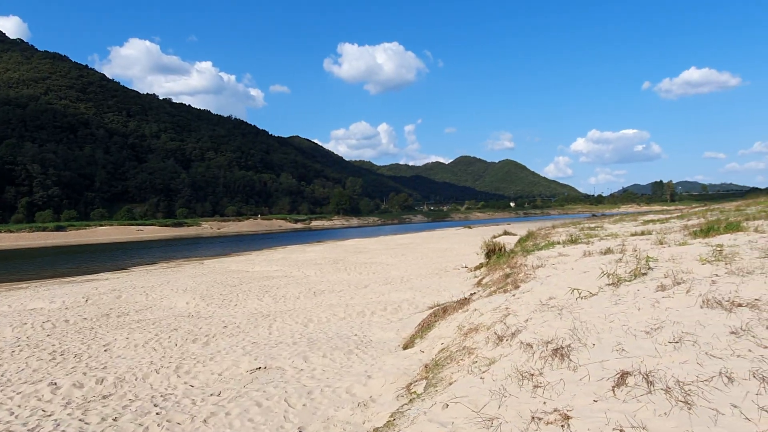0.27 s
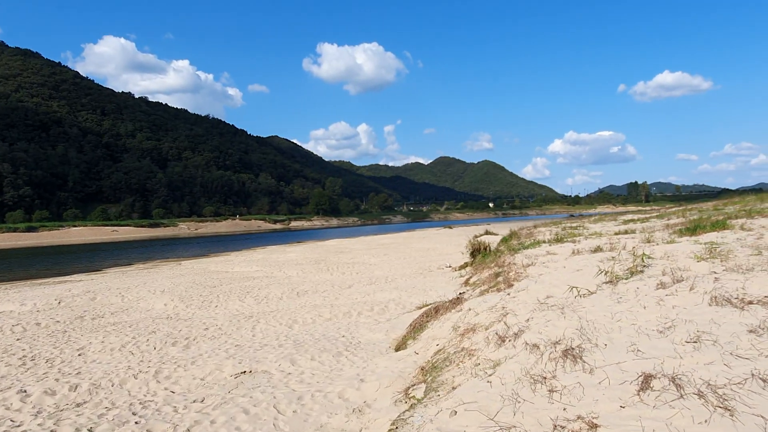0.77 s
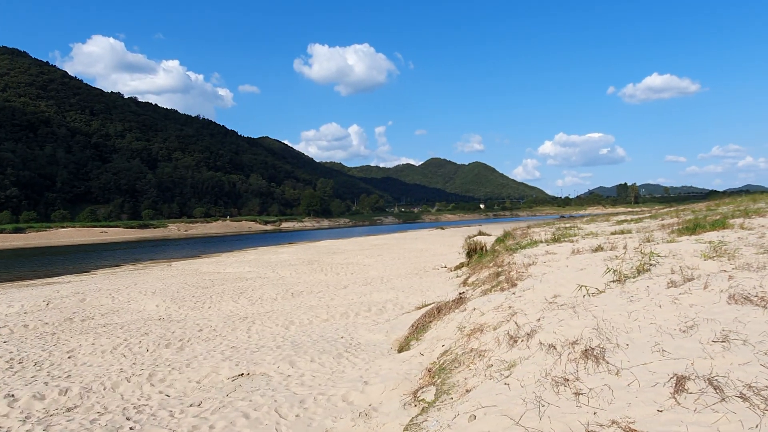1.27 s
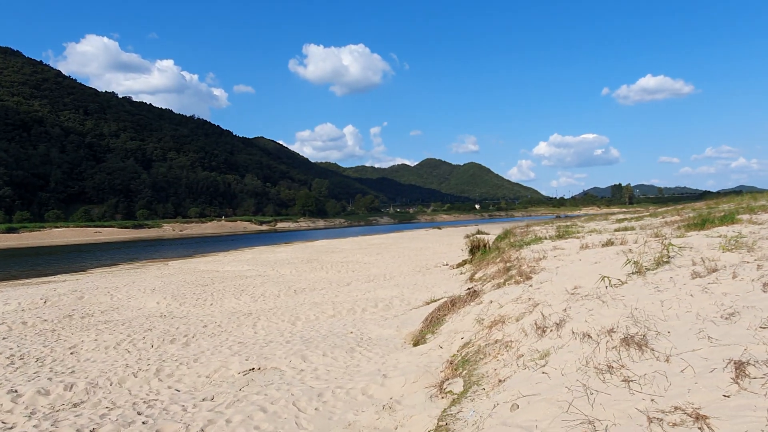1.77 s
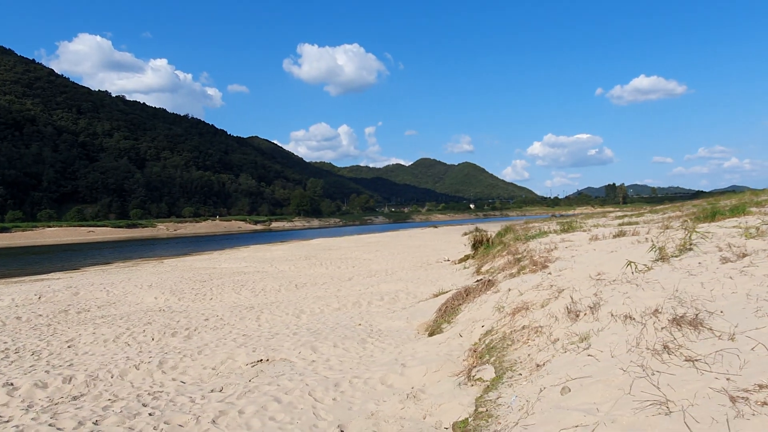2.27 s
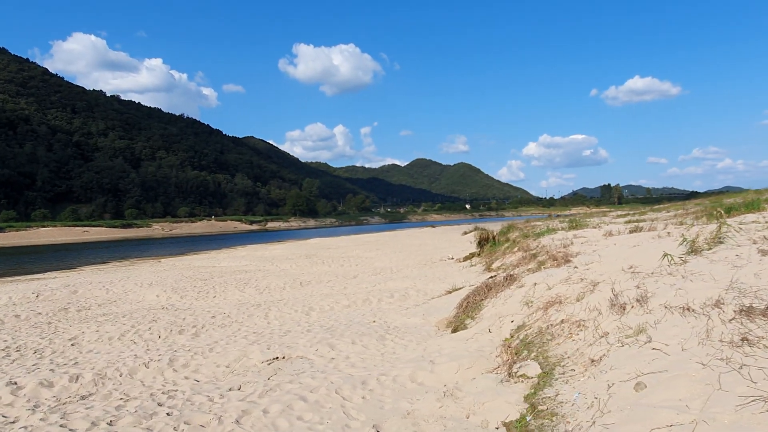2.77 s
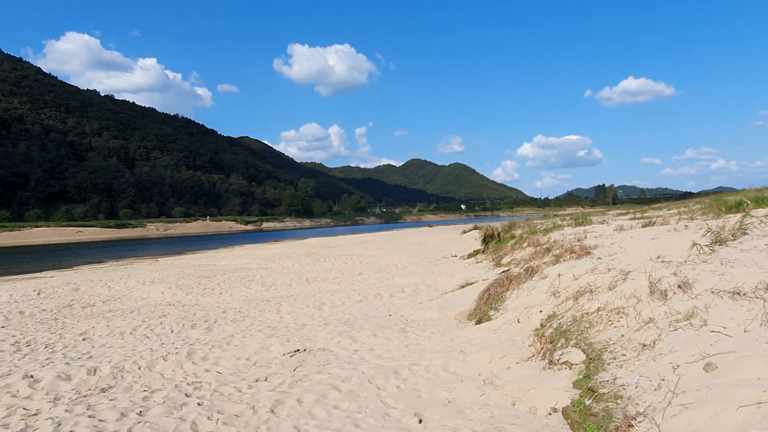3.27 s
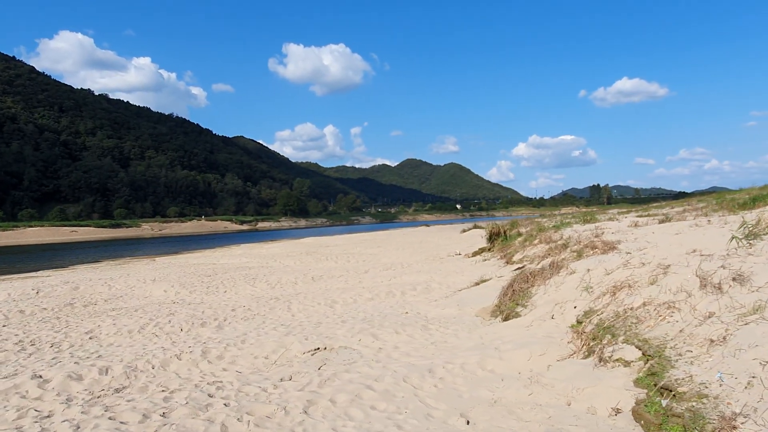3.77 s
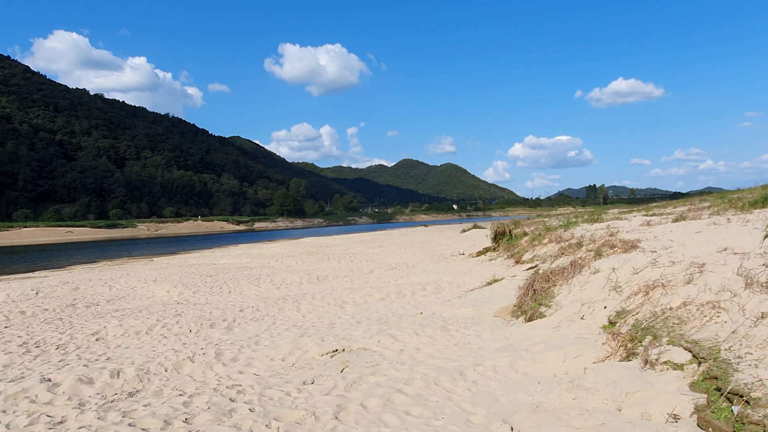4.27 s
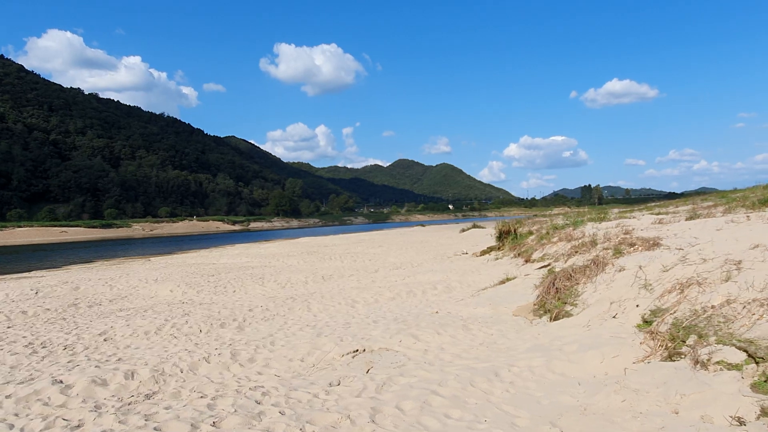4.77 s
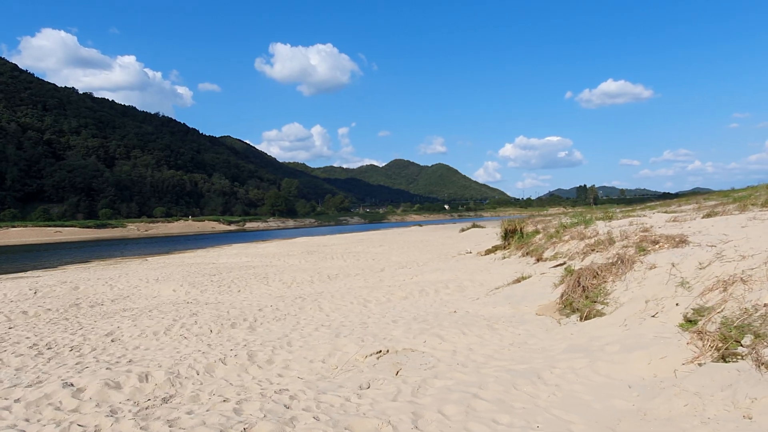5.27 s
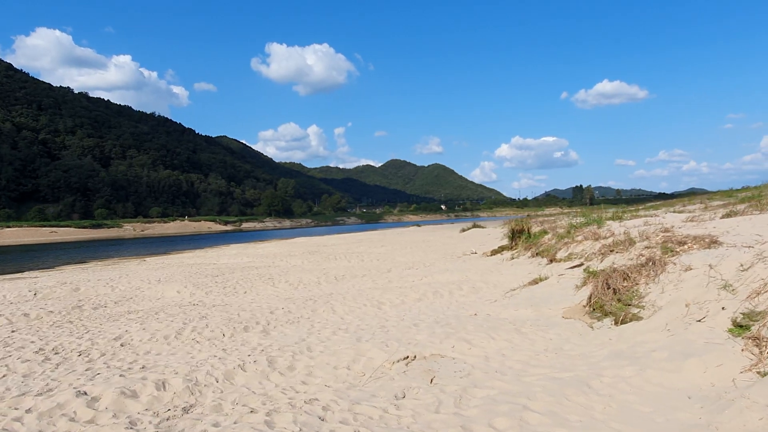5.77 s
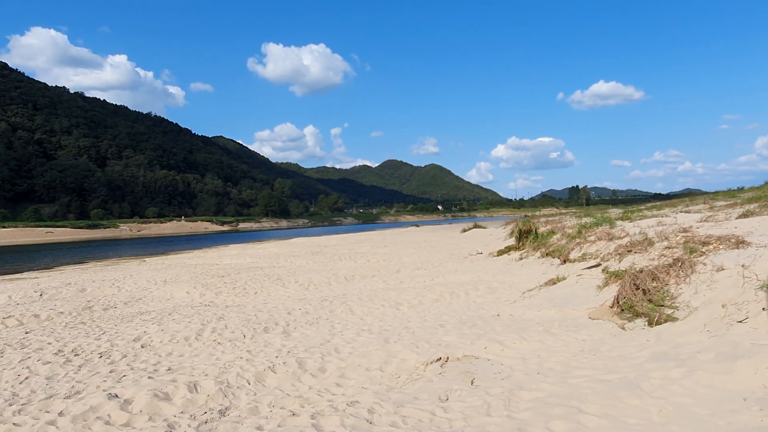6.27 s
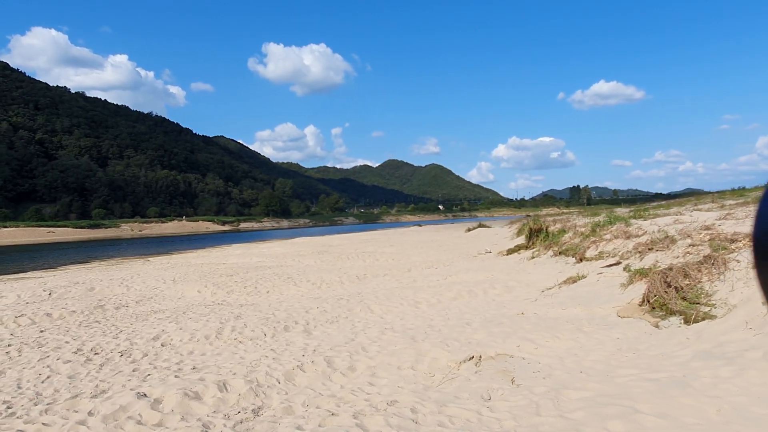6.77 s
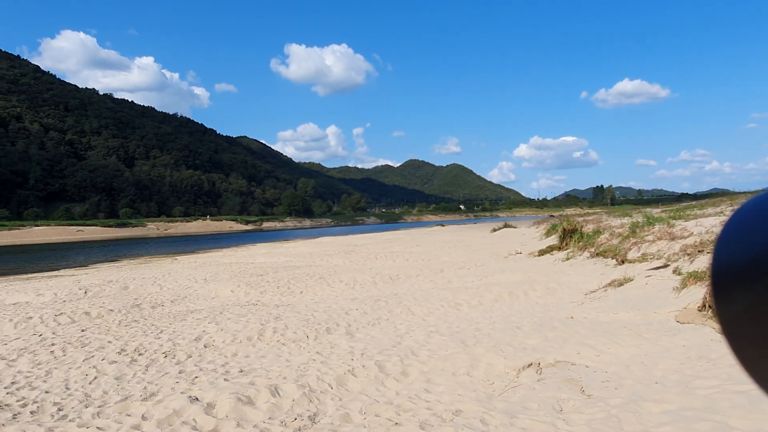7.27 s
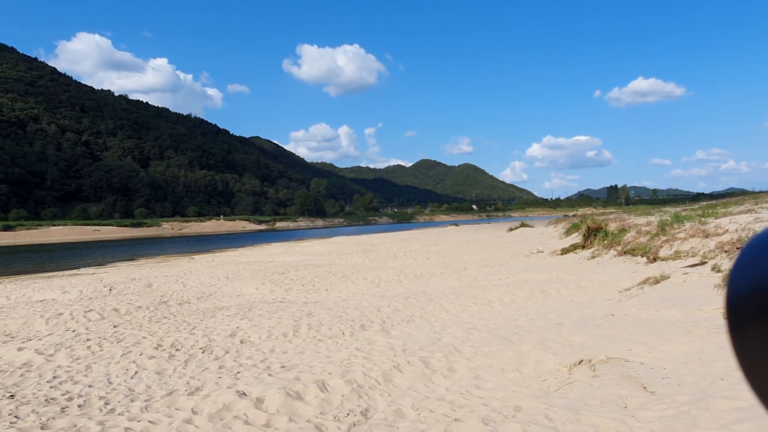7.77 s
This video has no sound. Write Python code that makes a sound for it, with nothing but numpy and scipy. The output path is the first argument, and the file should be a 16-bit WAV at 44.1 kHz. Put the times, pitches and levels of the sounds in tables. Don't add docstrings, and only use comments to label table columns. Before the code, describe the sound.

A bullfrog gives five slow, deep, rattling croaks on an open riverbank, over faint trilling frogs, soft bubbling water and buffeting wind.

```python
import sys
import numpy as np
from scipy import signal
from scipy.fft import rfft, irfft
from scipy.io import wavfile
from scipy.ndimage import uniform_filter1d, map_coordinates

SR = 44100
rng = np.random.default_rng(int(sys.argv[2]) if len(sys.argv) > 2 else 0)


def how_loud(loudness_db):
    steps = np.asarray(loudness_db, float) / 20
    return 10 ** steps


def store_pcm(level_fs):
    pcm = np.round(np.clip(level_fs, -1, 1) * 32767).astype(np.int16)
    wavfile.write(sys.argv[1], SR, np.atleast_2d(pcm).T)


N = 353196
TIME = np.arange(N) / SR
HZ = np.maximum(np.arange(N // 2 + 1) * SR / N, 1)

# start and end in seconds, effort in dB, edge against high throat in dB,
# mouth ring at the start against the end in dB.
CROAKS = [
    (0.48, 1.528, 0, -10.5, -36.5),
    (2.06, 2.997, 2.5, -8.5, -21),
    (3.529, 4.408, 10, -9, -13),
    (4.931, 5.764, 6.5, -6, -14),
    (6.337, 7.165, 5, -3.5, -21.5),
]
# time in seconds, pulses per second.
PULSE_RATE = [
    [(0.5784, 99.1), (0.79, 97.1), (1.0, 97.7), (1.21, 100.0), (1.38, 101.8), (1.44, 100.0)],
    [(2.1426, 100.2), (2.3375, 97.2), (2.525, 98.9), (2.7125, 101.7), (2.9, 102.0)],
    [(3.6163, 101.0), (3.7925, 98.1), (3.965, 99.9), (4.1375, 102.5), (4.31, 102.3)],
    [(5.0487, 98.4), (5.2075, 98.4), (5.365, 100.5), (5.5225, 102.5), (5.68, 102.4)],
    [(6.4267, 98.3), (6.5925, 97.8), (6.755, 99.7), (6.9175, 101.2), (7.08, 100.0)],
]
# first strong pulse in seconds, flutter in Hz,
# flutter depth in dB, sag just before in dB.
STROKES = [(0.554, 28.4, 17, 51), (0.986, 30.7, 13, -16.5), (1.227, 30, -14, -9.5), (2.148, 28.2, -4, 4),
           (2.507, 27.5, 1, -10.5), (2.735, 30, -4, -6), (3.628, 26, 32, -2), (3.918, 27.4, 4, -11),
           (4.138, 30, 4, -5.5), (5.036, 30, -2, -36), (5.344, 32, 5, -6), (5.503, 31.3, 2, -3),
           (6.415, 31, 87, -40), (6.761, 32, -2, 0), (6.954, 28.5, 12, -9)]
# middle in seconds, extra level in dB, length in seconds.
ACCENTS = [(0.557, 12, 0.01), (0.594, 7, 0.02), (0.622, -0.5, 0.015), (0.657, 6, 0.0086),
           (0.694, 4.0, 0.02), (0.73, 1, 0.03), (0.76, 5, 0.01), (0.781, 2, 0.01), (0.801, 5.5, 0.016),
           (0.838, 2.5, 0.022), (0.879, 4.5, 0.02), (0.904, 4.5, 0.019), (0.981, 6.5, 0.018),
           (1.012, 1.5, 0.02), (1.048, 4, 0.01), (1.089, 4.5, 0.013), (1.124, 5, 0.025), (1.154, 5, 0.016),
           (1.224, 2.5, 0.02), (1.289, 3.5, 0.0092), (2.151, 9, 0.01), (2.217, 6, 0.018), (2.252, 7, 0.012),
           (2.288, 5, 0.015), (2.33, 3, 0.017), (2.365, 4, 0.035), (2.396, 5.5, 0.012), (2.416, 4.5, 0.01),
           (2.436, 0, 0.0052), (2.513, 1, 0.016), (2.579, 4.5, 0.01), (2.609, 5, 0.013), (2.678, 5, 0.012),
           (2.727, -5, 0.01), (2.747, 0, 0.011), (2.786, 0, 0.01), (3.669, 7, 0.017), (3.7, 4, 0.02),
           (3.736, 4.0, 0.01), (3.756, 3.0, 0.01), (3.776, 2.5, 0.01), (3.817, 3, 0.011),
           (3.837, 4.5, 0.0087), (3.923, 3, 0.02), (3.988, 3, 0.0091), (5.105, 3.5, 0.018),
           (5.129, 4.5, 0.0084), (5.271, 6, 0.01), (5.346, 4.5, 0.018), (5.504, 1, 0.02), (6.443, 1, 0.02),
           (6.483, 5, 0.02), (6.518, 5.5, 0.03), (6.68, 4.5, 0.01), (6.731, -4, 0.01), (6.766, 5, 0.017),
           (6.831, 3.5, 0.01), (6.866, 2, 0.022), (6.901, 3, 0.014), (6.95, -3, 0.01),
           (3.952, 1.5, 0.016), (4.052, 2.5, .01), (4.077, 3.5, .01), (4.134, 4, 0.0081), (5.17, 4.5, .01),
         (5.202, 5, .02), (5.242, 5, 0.021), (5.389, 3, 0.028), (6.546, 5.5, 0.034), (6.601, 5, 0.024),
         (6.624, 4, 0.022), (6.652, 5, 0.025), (6.797, 2, .02), (.629, 8, 0.0063), (.844, 3, .01),
         (1.141, 6, 0.0091), (1.259, 5.5, .01), (2.183, 7, .03), (2.458, -3, .01), (2.565, 1, .02),
         (2.642, 6, 0.0091), (2.758, 3, 0.0087), (3.808, 3.5, 0.012), (3.899, 5, .01), (3.995, 2.5, 0.009),
         (5.151, 3, .01), (5.186, 1, .01), (5.325, 2.5, 0.027), (6.588, 1.5, 0.012), (6.618, 2, 0.011),
         (6.668, 2, .01), (0.786, -13, 0.0092), (0.983, -4.5, .01), (2.378, -12, 0.019), (6.54, -9, .01),
         (1.19, -7, .02)]
# rise in seconds, early level in dB,
# late level in dB, fade before the end in seconds, share of the effort (0-1).
PARTS = [
    (0.29, -44, -49.5, 0.14, 0.21),
    (0.19, -36.5, -36.5, 0.19, 0.1),
    (0.27, -34, -34, 0.23, 0.36),
    (0.23, -45.5, -39.5, 0.21, 0.072),
    (1, -86.5, -34, 0.12, 0.17),
]
ARCH_DB = [0.53, 0.11, 1.32, 0.11, 0.47]
RISE_DB = [50.6, 26, 64, 58.3, 30]
FADE_DB = [40.3, 48.6, 43.7, 57, 30]
RISE_BEND = [2.07, 2.02, 2.4, 0.64, 1.33]
FADE_BEND = [1.16, 1.35, 1.91, 1.45, 1.4]
# centre in Hz, width in Hz, early dB, late dB.
SAC = [(342, 133, -28.5, -2), (363, 92, 3.5, 11), (547, 34, 12.5, -22), (609, 117, 2, 10), (709, 67, 7, 4)]
LOW_THROAT = [(890, 81, 1.1, -8.5), (1042, 86, 9.3, -49), (1175, 168, 2.6, -11)]
HIGH_THROAT = [(1527, 126, 15.5, 11.5), (1765, 193, 14, 6), (2120, 1400, -31, -1.5)]
EDGE = [(2660, 270, -7, 15), (2850, 990, 22, -5.5), (3820, 3700, -39.5, 3)]
# centre in Hz, width in Hz, early dB, late dB.
SHOULDER = [(2000, 166, 4.5, 6), (2620, 760, 0, 5.5), (2750, 88, -32, -30)]
# centre in Hz, width in Hz, early dB, late dB.
HUM = [(388, 100, 12, -1.5), (482, 31, -26, -3.5), (324, 38, -17, -19)]
ROUGH = [.036, .015, .006, .009]
# centre in Hz, width in Hz, depth 0-1.
NOTCHES = [(1375, 51, 0.85), (2207, 22, 1)]
# start in Hz, end in Hz, width in Hz, level in dB,
# share of the croak at which the climb is done.
FILLING = [(471, 568, 45, 0, 0.34), (1038, 1206, 115, -4.5, 0.3)]
# time in seconds, loss while shut in dB.
OPENINGS = [(0.72, -12), (2.33, -8), (3.7, -6), (5.12, -8), (6.82, -11)]
# start in Hz, end in Hz, width in Hz, start level in dB, end level in dB.
MOUTH = [(6080, 4800, 240, -6, 15), (5030, 4600, 58, -7, 12.5), (7660, 5540, 490, -33, 10),
         (6650, 6300, 120, -18, 1), (7900, 4000, 4100, 2, -30), (7520, 6940, 114, -12, -3),
         (5250, 5110, 41, 0, 4.5)]
MOUTH_ENTERS = [0.05, 0.48, 0.05, 0.49, 0.05, 0.56, 0.53]
# centre in Hz, width in Hz, level in dB.
CRACK = [(4200, 900, 6), (7900, 1900, -3.5)]
# frequency in Hz, shade in dB, lag in radians.
FAR_PORT = [(0, 0, 0), (450, 3, .55), (900, -2, 1.3), (1200, -1, 1.3), (1500, -4, 1.9), (1900, -2, 1.7),
            (2400, 0, 2.3), (2750, 1, 3.8), (3700, -3, 5.0), (4300, 0, 4.8), (4650, 2, 6.3),
            (6300, -1, 9.6), (8000, 0, 11.5)]
TURN = [1.0, 0.01, -2.0, -1.3, 2.7]
# time in seconds, effort in dB, lead pitch in Hz.
CHORUS = [(0.0, -57.5, 2550), (0.2, -44, 2660), (0.36, -46.5, 2656), (0.44, -63.5, 3040), (0.55, -49, 2600),
          (0.68, -39, 2554), (0.8, -44.5, 2690), (1.55, -68, 2695), (1.8, -57, 2850), (2.0, -52.5, 2845),
          (3.0, -56.5, 2930), (3.23, -58, 2860), (3.33, -67, 2842), (3.57, -55.5, 2850),
          (4.52, -60.5, 2510), (4.82, -51, 2833), (5.85, -53, 2743), (6.0, -57, 2776), (6.1, -63.5, 2750),
          (6.3, -64.5, 2700), (6.42, -53.5, 2590), (7.25, -58, 2660), (7.38, -69.5, 2660),
          (7.55, -60, 2710), (7.68, -54, 2690), (7.8, -52.5, 2750), (8.0, -59, 2670)]
# middle in seconds, level in dB, half length in seconds.
CHIRPS = [(1.68, -81, 0.024), (3.4, -54.5, 0.031), (4.58, -47, 0.013), (6.22, -58.5, 0.04),
          (7.47, -58, 0.06)]
# middle in seconds, level in dB, half length in seconds.
GRUNTS = [(0.15, -49, 0.04), (0.43, -55, 0.014), (1.62, -50, 0.1), (7.55, -57, 0.045), (7.88, -53, 0.055)]
# start in seconds, peak in dB, pitch in Hz, 60 dB decay in seconds, left-right in dB.
PEEPS = [(0.1451, -46, 1300, 0.034, 9), (1.6621, -53, 1830, 0.044, -8), (1.7554, -61, 1930, 0.18, 5),
         (3.1757, -74, 1690, 0.21, -18), (3.4256, -65, 2000, 0.14, 2), (4.43, -63, 2090, 0.08, -22),
         (4.9601, -38.5, 1750, 0.019, -2), (5.7708, -64, 1980, 0.11, 3), (6.0162, -55, 2120, 0.075, 6),
         (7.436, -66, 2120, 0.15, 1.0), (7.5004, -55, 1490, 0.088, -0.5), (7.6994, -65, 1480, 0.12, 7),
         (7.8565, -68, 1700, 0.082, 11)]
# start in seconds, peak in dB, pitch in Hz, left-right in dB.
THUMPS = [(0.028, -39, 157, -9), (0.264, -46, 240, -14), (1.267, -35, 205, 11), (1.299, -35, 196, 2),
          (1.674, -27.5, 169, 9), (3.213, -43, 394, -25)]
# time in seconds, gain in dB.
FACING = [(0.0, 10), (0.08, -2.5), (0.55, -5), (1.6, 1.5), (2.1, 10), (3.5, 5.5), (4.5, -0.5), (5.0, 6.5),
          (5.8, -3), (6.4, -2), (7.4, -6), (7.6, 1.5), (8.0, -7.5)]
# time in seconds, level in dB.
BREEZE = [(0.0, -66), (0.9, -48), (1.45, -61), (1.95, -32.5), (2.4, -40.5), (2.85, -40), (3.1, -52.5),
          (3.62, -62), (3.72, -42.5), (3.95, -45), (4.5, -62), (4.75, -47), (5.55, -48), (5.8, -69),
          (6.8, -57), (7.08, -39), (7.4, -75), (8.0, -63.5)]
# middle in seconds, level in dB, half length in seconds.
PUFFS = [(5.94, -51, 0.019), (6.18, -50.5, 0.031), (7.62, -48, 0.033)]
# middle in seconds, level in dB, half length in seconds.
GUSTS = [(0.05, -41, 0.037), (0.28, -50, 0.058), (0.56, -45, 0.034), (0.92, -47, 0.065), (1.12, -50, 0.064),
         (1.35, -44.5, 0.091), (1.6, -40, 0.11), (2.0, -34, 0.032), (2.24, -27.5, 0.021), (2.73, -42, 0.17),
         (2.9, -52, 0.02), (3.93, -40, 0.025), (5.6, -47, 0.026), (5.72, -54, 0.014), (7.1, -61, 0.029)]
# frequency in Hz, level in dB per Hz.
GUST_TONE = [(22, -45), (38, 9.5), (70, 14), (114, 5), (172, -3.5), (220, -6), (280, -13), (360, -32),
             (620, -120)]
# middle in seconds, level in dB, half length in seconds.
RUSTLE = [(0.67, -51.5, 0.03), (0.9, -64.5, .2), (1.36, -58, 0.11), (2.5, -62.5, 0.24), (2.8, -62, 0.41),
          (3.37, -63.5, 0.14), (3.9, -63.5, 0.46), (5.24, -58, 0.1), (6.25, -67, .03), (6.7, -64.5, 0.19),
          (7.12, -59.5, 0.057), (7.64, -66, 0.045)]
# frequency in Hz, level in dB per Hz.
HISS = [(2000, 2.5), (3400, -0.5), (5280, -5.5), (9600, -3), (10700, -3), (12700, 2), (14200, 4),
        (15600, -8)]
# frequency in Hz, left-right in dB.
HISS_PAN = [(4000, -.5), (8000, 0), (11000, -4), (15000, -7)]
# frequency in Hz, level in dB per Hz.
AIR = [(150, -66), (260, -62), (400, 0), (1000, 10), (1500, 2), (2100, -2.5), (3400, -17), (5000, -78)]


def bullfrog():
    levels_db, bright_db, progress = breath()
    clicks, place, flutter, sag = larynx()
    push = flutter + sag
    puff = rng.standard_normal(N) * (.35 + np.exp(-3.0 * place))
    voice = open_top(body(clicks, puff, push, levels_db, bright_db, progress))
    voice += filling(clicks * how_loud(0.22 * push) + 0.047 * puff, progress, levels_db[:2])
    voice += mouth((clicks + 0.079 * puff) * how_loud(1.3 * flutter + 1.48 * sag), progress, levels_db[3])
    snap = (clicks + .3 * puff * np.exp(-9.0 * place)) * how_loud(3.2 * push)
    voice += crack(snap, levels_db[2])
    voice *= how_loud(1.5)
    hz, shade_db, lag = np.transpose(FAR_PORT)
    right = colour(voice, how_loud(np.interp(HZ, hz, shade_db)) * np.exp(-1j * np.interp(HZ, hz, lag)))
    return np.array([voice, turned(right)]) + bank_echoes(voice)


def breath():
    croak = np.clip(np.searchsorted([c[0] for c in CROAKS], TIME + .2) - 1, 0, None)
    start, end, effort_db, edge_db, mouth_db = np.transpose(CROAKS)[:, croak]
    progress = np.clip((TIME - start) / (end - start), 0, 1)
    levels = []
    for part, arch_db, rise_db, fade_db, rise_bend, fade_bend in zip(
            PARTS, ARCH_DB, RISE_DB, FADE_DB, RISE_BEND, FADE_BEND):
        rise, early_db, late_db, fade, share = part
        held = early_db + (late_db - early_db) * progress + arch_db * np.sin(np.pi * progress)
        swell = rise_db * np.clip(1 - (TIME - start) / rise, 0, 2) ** rise_bend
        fall = fade_db * np.clip(1 - (end - TIME) / fade, 0, 2) ** fade_bend
        levels.append(held + share * effort_db - swell - fall)
    levels[3] = levels[3] + mouth_db * (1 - progress)
    return levels, edge_db, progress


def larynx():
    drop, drop_s = .13, .13
    slowing = sum(np.interp(TIME, [c[1] - drop_s, c[1], c[1] + .2], [0, drop, 0]) for c in CROAKS)
    cycles = np.cumsum(in_time(PULSE_RATE)[0] * (1 - slowing)) / SR
    firsts = np.array([round(p[0][0] * SR) for p in PULSE_RATE])
    croak = np.clip(np.searchsorted(firsts, np.arange(N) + SR // 4) - 1, 0, None)
    jitter = .013 * drift(40.7)
    clicks, place = pulses(cycles - cycles[firsts][croak] - .06 + jitter)
    start, rate, depth_db, sag_db = np.transpose(STROKES)
    stroke = np.clip(np.searchsorted(start, TIME + 0.0061) - 1, 0, None)
    beat = np.cos(2 * np.pi * rate[stroke] * (TIME - start[stroke])) + 0.5 * drift(68)
    to_next = np.append(start[1:], 99)[stroke] - TIME
    sag = np.clip(1 - to_next / 0.11, 0, .6) * np.append(sag_db[1:], 0)[stroke]
    flutter = .2 * np.minimum(depth_db[stroke], 5) * np.tanh(beat) * how_loud(sag)
    return clicks, place, flutter + 1.05 * accents() - 11, sag


def accents():
    return sum(db * np.clip(.5 + (length / 2 - np.abs(TIME - s)) / .003, 0, 1)
               for s, db, length in ACCENTS)


def body(clicks, puff, push, levels_db, bright_db, progress):
    sac_db, low_db, high_db, _, hum_db = levels_db
    path = body_path()
    edge_db = high_db + 2.8 * np.minimum(high_db + 32.0, 0) * (progress < .5) + bright_db
    edge_db = edge_db - 14 * np.clip((progress - .78) / .22, 0, 1)
    shoulder_db = high_db - 11.5 - 0.63 * bright_db
    cavities = (    # resonances, level dB, response to pushing, air noise share, bend of the crossfade
        (SAC, sac_db, .5, ROUGH[0], 2.5),
        (LOW_THROAT, low_db, .6, ROUGH[1], 1.2),
        (HIGH_THROAT, high_db, 1.1, ROUGH[2], 1.2),
        (EDGE, edge_db, 1.1, ROUGH[3], 1.2),
        (HUM, hum_db, .15, .004, 2.5),
        (SHOULDER, shoulder_db, 1.1, ROUGH[2], 1.2))
    voice = np.zeros(N)
    for rings, level_db, shake, rough, bend in cavities:
        own_db = .45 * shake * (1 - 0.6 * progress) * drift(30)
        air = rough * (1.35 + 0.37 * progress ** 2) * puff * how_loud(0.035 * push)
        drive = clicks * how_loud(np.minimum(shake, 1) * push + own_db) + air
        early, late = (rms_one(colour(drive, modes(rings, column) * path)) for column in (2, 3))
        voice += how_loud(level_db) * (early + (late - early) * progress ** bend)
    return voice


def body_path():
    sweep_s = .0039 * (1000 / np.clip(HZ, 500, 4500) - .5)
    sweep = np.exp(-2j * np.pi * np.cumsum(sweep_s) * SR / N)
    sweep = sweep / (1 + (HZ / 3800) ** 22) / (1 + (250 / HZ) ** 8)
    ground = 1 + how_loud(-14) * np.exp(-2j * np.pi * HZ * .0043)
    for hz, width, depth in NOTCHES:
        ground = ground * (1 - np.clip(depth, 0, .95) / (1 + (2 * (HZ - hz) / width) ** 2))
    return sweep * ground


def open_top(x):
    top = colour(x, 1 / (1 + (3150 / HZ) ** 24))
    shut_db = sum(db * np.clip((s - TIME) / .08, 0, 1) * (TIME > s - .6) for s, db in OPENINGS)
    leak_db = 0.57 * uniform_filter1d(accents(), size=300) * (shut_db < 0)
    return x + top * (how_loud(shut_db + leak_db) - 1)


def filling(drive, progress, levels_db):
    out = np.zeros(N)
    for (a, b, width, db, done), level_db in zip(FILLING, levels_db):
        ring = moving_ring(drive, a + (b - a) * np.clip(progress / done, 0, 1), width)
        out += how_loud(level_db + db - 10 * np.clip(progress / done - 1, 0, 3)) * rms_one(ring)
    return out


def mouth(drive, progress, level_db):
    out = np.zeros(N)
    for (a, b, width, a_db, b_db), enters in zip(MOUTH, MOUTH_ENTERS):
        ring = rms_one(moving_ring(drive, a + (b - a) * progress ** .55, width))
        waiting_db = 25 * np.clip((enters - progress) / .1, 0, 1)
        out += how_loud(a_db + (b_db - a_db) * progress - waiting_db) * ring
    return how_loud(level_db) * out / np.sqrt(uniform_filter1d(out ** 2, size=9000) + 1e-9)


def crack(snap, high_db):
    level_db = high_db + 1.7 * np.minimum(high_db + 31.0, 0) - 31.5
    return how_loud(level_db) * rms_one(colour(snap, modes(CRACK, 2)))


def turned(x):
    middles = [(c[0] + c[1]) / 2 for c in CROAKS]
    return map_coordinates(x, [np.arange(N) + np.interp(TIME, middles, TURN)], order=3, mode="nearest")


def bank_echoes(x):
    tail = rng.standard_normal((2, N)) * how_loud(-60 * TIME / .2) * (TIME > .002)
    tail = tail / np.sqrt(np.sum(tail ** 2) / 2)
    return how_loud(-17) * colour(x, rfft(tail) / (1 + (HZ / 4000) ** 2))


def chorus():
    trill_db, lead_hz = in_time([CHORUS])
    grunt_db = -69.5 + (trill_db - trill_db.mean()) + 0.45 * in_time([FACING])[0]
    trill, grunt = np.zeros((2, N)), np.zeros((2, N))
    frogs = (
        (lead_hz, 170, 4, 7), (.96 * lead_hz, 144.5, -2, 11), (.91 * lead_hz, 187.5, -13, 2),
        (1.075 * lead_hz, 150, -1, 11), (2800, 126.5, -3, -4))
    for hz, per_s, db, lag in frogs:
        train = pulses(np.cumsum(per_s * (1 + .04 * drift(6))) / SR)[0]
        clicks = (train + .05 * rng.standard_normal(N)) * how_loud(db + 4 * drift(12))
        bend = 1 + .012 * drift(7)
        high = moving_ring(clicks, hz * bend, 80)
        low = moving_ring(clicks, .42 * hz * bend, 240)
        trill += [high, np.roll(high, lag)]
        grunt += [low, np.roll(low, -lag // 4)]
    trill_gain = np.hypot(how_loud(trill_db), swells(CHIRPS)) * how_loud(7.5)
    grunt_gain = np.hypot(how_loud(grunt_db), swells(GRUNTS)) * how_loud(-1.0)
    return trill_gain * even(trill) + grunt_gain * even(grunt)


def even(x):
    return x / np.sqrt(uniform_filter1d(x[0] ** 2, size=5000))


def peeps():
    out = np.zeros((2, N))
    thumps = [(s, db, hz, .03, pan_db) for s, db, hz, pan_db in THUMPS]
    for s, db, hz, t60, pan_db in [*PEEPS, *thumps]:
        first = int(s * SR)
        t = np.clip(TIME[first:int((s + .3) * SR)] - s, 0, None)
        tone = np.sin(2 * np.pi * hz * t * (1 + 0.033 * t))
        note = tone * (1 - np.exp(-t / 0.0035)) * how_loud(db + 10.0 - 60 * t / t60)
        out[:, first:first + len(t)] += pan(note, pan_db)
    return out


def wind():
    breeze, gusts = how_loud(in_time([BREEZE])[0]), swells(GUSTS)
    tone = how_loud(at_hz(GUST_TONE))
    rumble = [rms_one(colour(rng.standard_normal(N) * how_loud(5.2 * drift(38)), tone)) for side in "LR"]
    windward = breeze + swells(PUFFS) + gusts * how_loud(-1)
    sheltered = breeze * how_loud(-22) + gusts
    return np.array([windward, sheltered]) * rumble


def water():
    db = -59 + in_time([FACING])[0]
    out, pitches = np.zeros((2, N)), np.geomspace(310, 1200, 10)
    for side in (0, 1):
        born = rng.random(N) < 900 * how_loud(5 * drift(25)) / SR
        born = born * how_loud(4.2 * np.minimum(rng.exponential(1, N), 4))
        dealt = rng.integers(0, 10, N)
        for k, hz in enumerate(pitches):
            r, w = how_loud(-60 / (19.0 / hz * SR)), 2 * np.pi * hz / SR
            hits = born * (dealt == k) + 1e-18
            bubbles = signal.lfilter([0, np.sin(w)], [1, -2 * r * np.cos(w), r * r], hits)
            out[side] += bubbles * (hz / 300) ** -.3
        out[side] = rms_one(colour(out[side], 1 / (1 + (270 / HZ) ** 8) / (1 + (HZ / 1500) ** 3)))
    return pan(how_loud(db + 3.5) * out, np.array(-9))


def hiss():
    white, tilt = rng.standard_normal((2, 2, N)), at_hz(HISS_PAN) / 2
    top = rms_one(colour(white[0], how_loud(at_hz(HISS) + np.array([tilt, -tilt]))))
    wash = rms_one(colour(white[1] + 0.21 * white[1, 0], how_loud(at_hz(AIR))))
    wash = wash * how_loud(-56.5 + 2.0 * drift(4.8))
    level = np.sqrt(how_loud(-68) ** 2 + pan(swells(RUSTLE), 1) ** 2)
    return top * level * how_loud(3.5 + .5 * drift(25)) + wash


def rms_one(x):
    return x / np.sqrt(np.mean(x ** 2) + 1e-20)


def in_time(tables):
    s, *columns = np.vstack(tables).T
    return [np.interp(TIME, s, c) for c in columns]


def at_hz(points):
    hz, db = np.transpose(points)
    return np.interp(np.log(HZ), np.log(hz), db)


def colour(x, response):
    return irfft(rfft(x) * response, N)


def pan(x, db):
    return x * how_loud(np.array([db / 2, -db / 2]).reshape(2, -1))


def drift(rate):
    shape = (HZ > 1) / (1 + (HZ / rate) ** 2) + 0.33 * (HZ <= 1)
    return rms_one(colour(rng.standard_normal(N), shape))


def swells(rows):
    return np.sqrt(sum(how_loud(2 * db) * np.exp(-((TIME - s) / half) ** 2) for s, db, half in rows))


def pulses(cycles):
    place = cycles % 1
    at = np.flatnonzero(np.diff(np.floor(cycles)) > 0) + 1
    late = np.clip(place[at] / (cycles[at] - cycles[at - 1]), 0, 1)
    clicks = np.zeros(N)
    clicks[at - 1], clicks[at] = late, 1 - late
    return clicks, place


def moving_ring(x, hz, width_hz):
    turn = np.exp(2j * np.pi * np.cumsum(hz) / SR)
    r = np.exp(-np.pi * width_hz / SR)
    return (turn * signal.lfilter([(1 - r) ** 2], [1, -2 * r, r * r], x / turn)).real


def modes(rows, column):
    return np.sqrt(sum(how_loud(2 * row[column]) / (1 + (2 * (HZ - row[0]) / row[1]) ** 2) ** 2 for row in rows))


def scene():
    return bullfrog() + chorus() + peeps() + wind() + water() + hiss()


def band_limit(x):
    return signal.sosfilt(signal.butter(12, 15720, fs=SR, output="sos"), x)


def record(dry):
    return band_limit(dry)


dry = scene()
out = record(dry)
store_pcm(out)
```